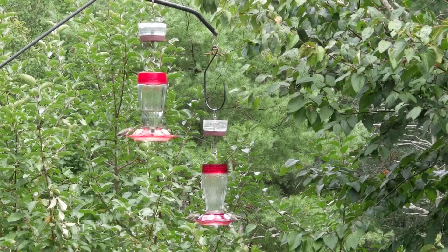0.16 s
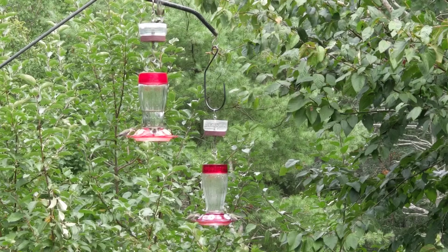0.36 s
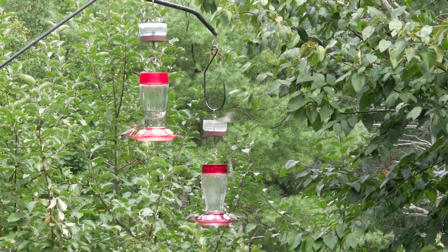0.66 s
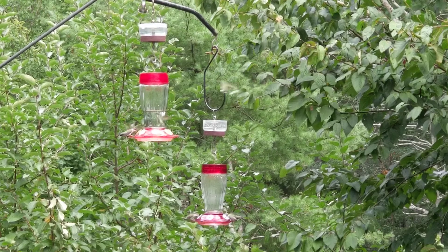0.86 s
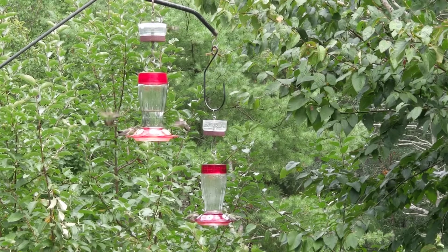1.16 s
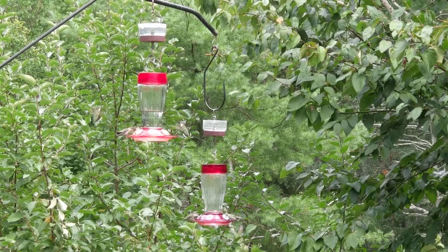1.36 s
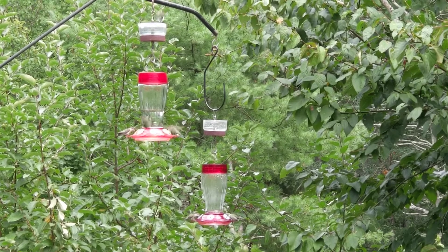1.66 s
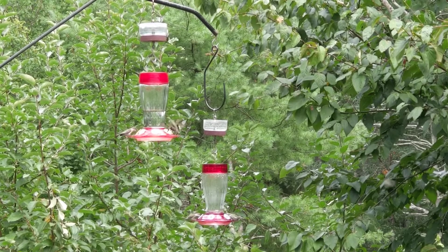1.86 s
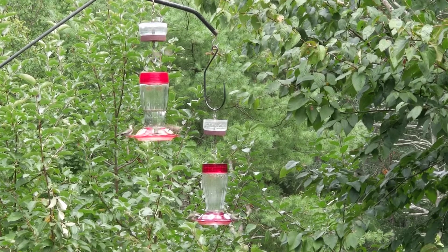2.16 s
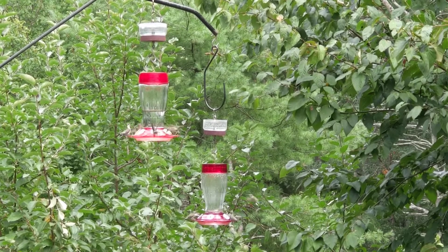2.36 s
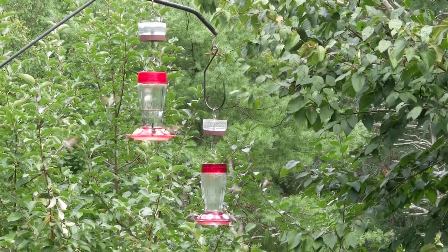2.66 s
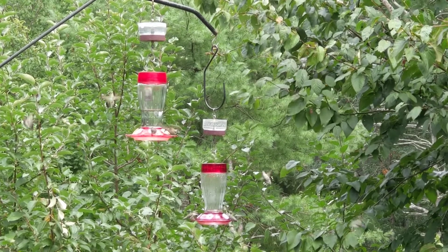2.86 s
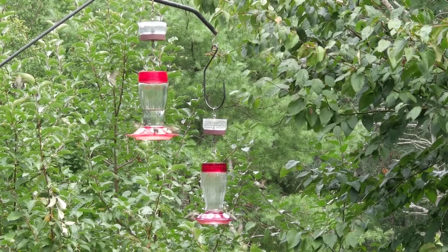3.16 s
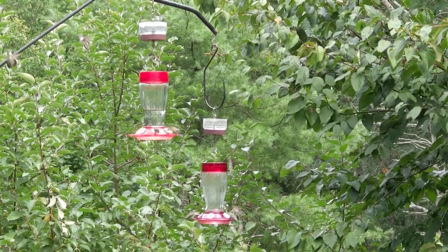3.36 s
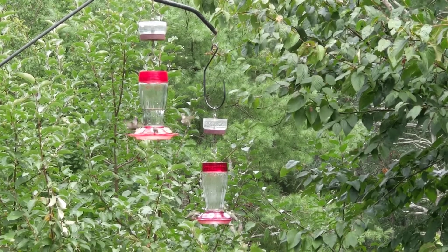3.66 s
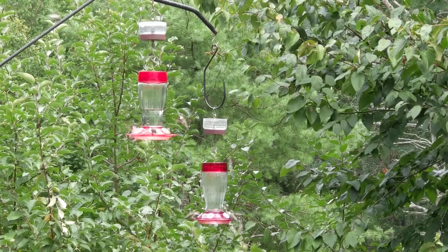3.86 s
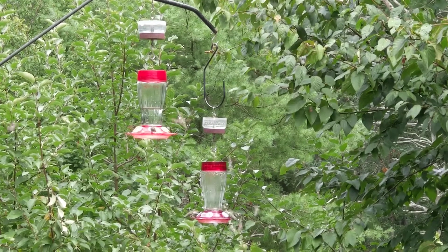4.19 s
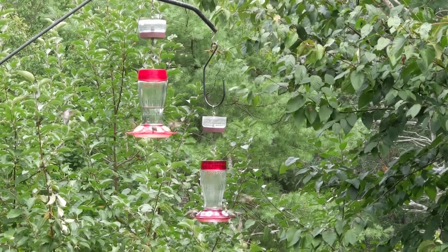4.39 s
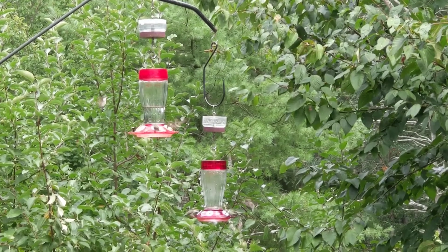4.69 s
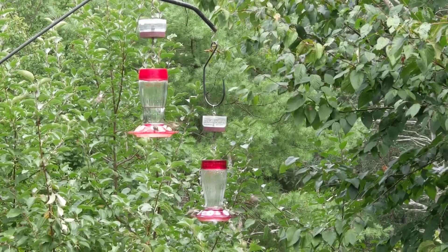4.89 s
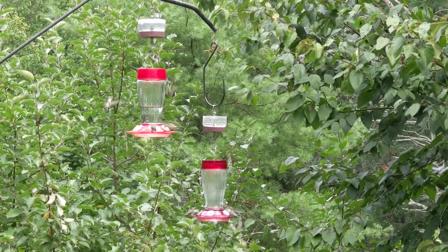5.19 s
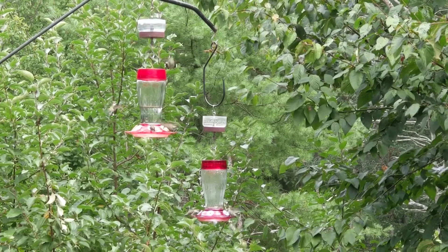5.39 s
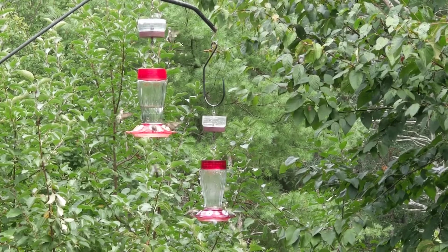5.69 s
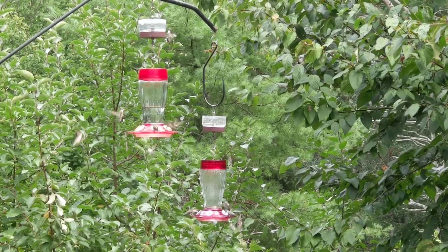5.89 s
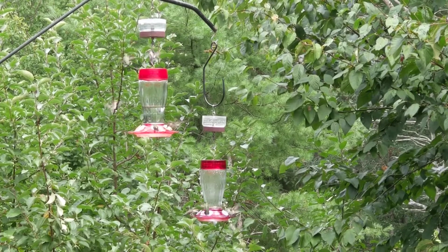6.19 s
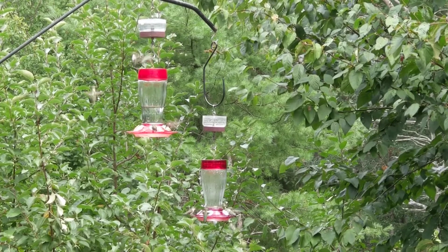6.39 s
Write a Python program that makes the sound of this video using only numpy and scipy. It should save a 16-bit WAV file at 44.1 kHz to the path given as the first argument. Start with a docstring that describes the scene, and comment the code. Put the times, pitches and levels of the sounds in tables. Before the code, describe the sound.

Soft low wingbeat hum and rapid, tiny hummingbird calls open close to the microphone: piercing squeals, brief rattling trills and dry falling chips. They stop near two seconds, leaving thin cricket shimmer, leafy hiss, bass rumble and a faint two-tone machine hum. Past four seconds the birds return deeper in foliage with squeals, a trill and buzzes, then spaced chips fading away. Open garden, wide stereo, light scatter from leaves.

```python
"""Thin squeals, trills, buzzes and dry chips come first: hummingbirds squabbling in a leafy summer backyard.
Their calls are gliding or swooping oscillators shaped by the beak and scattered by the foliage.
Wingbeats add low hums; cricket strokes and bands of noise make a high pulsing whine.
Far birds whistle in pure tones, tiny ticks are bursts of bright noise, and behind it all lie
a low rumble and leaf hiss of coloured noise and a faint wavering two-tone machine hum."""
import sys
import numpy as np
from scipy import signal
from scipy.fft import rfft, irfft, next_fast_len
from scipy.io import wavfile

SR = 44100
rng = np.random.default_rng(int(sys.argv[2]) if len(sys.argv) > 2 else 0)


def persist_wave(psi):
    """Save psi, clipped to +-1, as 16-bit WAV."""
    counts = np.round(np.clip(psi, -1, 1) * 32767).astype(np.int16)
    wavfile.write(sys.argv[1], SR, np.atleast_2d(counts).T)


N = 288414
T = np.arange(N) / SR   # sample times, s
CUTOFF_HZ = 15700       # top of the microphone's range

# Low outdoor rumble, all round. Each row: frequency in Hz, relative density in dB per Hz.
RUMBLE_SPECTRUM = [(25, -38), (45, -26.5), (85, -17), (110, -6.5), (140, 0.5), (210, 0), (255, -7),
                   (305, -5), (410, -12.5), (540, -13), (680, -13), (880, -21.5), (1600, -27.5),
                   (2100, -33)]
# Hiss of leaves and far insects. Each row: frequency in Hz, relative density in dB per Hz.
HISS_SPECTRUM = [(1700, -75), (2100, -13.5), (2420, -4), (2800, -6), (3850, -6), (4200, -10), (4600, -5),
                 (5400, -6.5), (5800, -9.5), (6400, -8), (9300, -18), (10000, -17), (11000, -15.5),
                 (14200, -16), (14700, -34), (15200, -61)]
# Slow course of the hiss. Each row: time in seconds, level in dB.
HISS_LEVEL_CURVE = [(0, -60.5), (2.2, -62), (3.9, -62.5), (4.6, -60.2), (5.6, -60), (6.54, -61)]
RUSTLE_DB = .7          # spread of the quick changes in the hiss
# Two tones of a distant machine. Each row: frequency in Hz, level against the curve below in dB.
MACHINE_TONES = [(341.5, -4), (465, -9.5)]
# Slow course of the machine hum. Each row: time in seconds, level in dB.
MACHINE_LEVEL_CURVE = [(0, -46.5), (.55, -63), (.8, -57.5), (1.65, -53.5), (2.4, -69), (3.6, -54),
                       (5, -56.5), (5.45, -50.5), (6.15, -55), (6.54, -58.5)]
# Stereo width of all continuous noise. Each row: frequency in Hz, side minus mid in dB.
STEREO_WIDTH = [(60, -26), (92, -15), (140, -23.5), (210, -17.5), (330, -13.5), (500, -11), (770, -7),
                (1170, -2.5), (1790, -1), (2740, -3.5), (4190, -0.5), (6410, -1), (9810, -1), (15000, 0.5)]

# Far crickets merged to a whine. Each row: frequency in Hz, relative density in dB per Hz.
SWARM_SPECTRUM = [(6300, 2), (6600, 18), (7000, 18.5), (7400, 21.5), (8100, 20), (8400, 0), (8900, -14),
                  (9400, -11)]
# Distant trilling crickets that stand out. Each row: centre in Hz, width in Hz, level in dB.
CRICKET_LINES = [(6720, 45, -69), (6890, 57, -73), (7500, 31, -76), (8130, 29, -70.5), (8520, 59, -66.5),
                 (9060, 91, -72)]
# Faint far insects that come and go. Each row: centre in Hz, width in Hz, level in dB.
CHIRR_BANDS = [(2410, 210, -72.5), (3510, 220, -82.5), (4470, 130, -77.5), (5230, 120, -76),
               (6140, 180, -76)]

# One far bird's slurred whistle. Each row: time in seconds, pitch in Hz, level in dB.
SLURRED_WHISTLE_CURVE = [(1.9, 2520, -70), (1.92, 2515, -63), (1.95, 2485, -57.5), (1.97, 2430, -59),
                         (1.99, 2405, -60), (2.04, 2420, -62), (2.11, 2450, -63), (2.14, 2470, -73)]
# Lower, fainter far whistles. Each row: start in seconds, length in seconds, first pitch in Hz,
# last pitch in Hz, bend in the middle in Hz, peak level in dB, place of the peak 0-1.
LOW_WHISTLES = [(5.304, 0.43, 1387, 1370, -15, -70, 0), (5.612, 0.13, 1540, 1580, -2, -64.5, 0.4)]
WHISTLE_SWELL_DB, WHISTLE_BEND = 5, 0.77   # rise and fall; below 1 the pitch moves fastest at the start

# Hovering birds. Each row: start in seconds, length in seconds, hum pitch in Hz before drift and sag,
# level in dB, tilt of the overtones in dB per octave.
HOVERING_BIRDS = [(-.15, 0.89, 163.4, -42.5, 0.5), (.68, 1.14, 163.7, -43, -21), (3, 0.45, 139.7, -53.5, 4),
                  (3.6, 0.5, 149.8, -60.5, 16), (3.85, 0.43, 135, -52, 1.5),
                  (4.299, 0.84, 136.6, -47.5, 1.5), (4.2, 0.84, 152.5, -53.5, 12)]
# Partials of the wing hum. Each row: multiple of the hum pitch, level in dB before the tilt.
WING_PARTIALS = [(1, -1.5), (1.5, -18), (2, -12)]
HOVER_ARRIVE_S, HOVER_LEAVE_S, HOVER_SAG_HZ = 0.16, 0.16, 2.6   # swell, fade, and sag during the fade

# Tiny bright ticks. Each row: start in seconds, first level in dB before the high-pass.
BRIGHT_TICKS = [(5.741, -55), (5.997, -46)]

# Resonance of throat and open beak. Each row: frequency in Hz, gain in dB.
OPEN_BEAK = [(2000, 9), (2600, -13.5), (4000, -12.5), (5200, -16), (6300, -4.5), (7600, -1), (9200, -11),
             (12000, -12.5), (14000, -17.5), (15600, -37), (17000, -50)]
# Beak nearly shut for a chip. Each row: frequency in Hz, gain in dB.
SHUT_BEAK = [(1800, -32), (2100, -17), (2400, -6), (2750, -11.5), (3400, -12), (4200, -12.5), (5200, -14),
             (6000, -14.5), (7500, -10), (9000, -16.5), (10500, -17), (12500, -22), (15500, -37)]
RIGHT_DELAY_MS = 0.035   # the feeders hang a little to the left
# All call levels below are taken ahead of the beak's gain.

# Squeals. Each row: start in seconds, length in seconds, first pitch in Hz, last pitch in Hz,
# peak level in dB, place of the peak 0-1, dB per overtone, left minus right in dB,
# delay of the right channel in ms. The arch below is added to the pitch.
SQUEAL_CALLS = [(0.033, 0.041, 7440, 7330, -43, 0.2, 7, 2, 0.039),
                (1.305, 0.039, 7700, 7400, -37, 0.2, -4, 1, .043),
                (1.342, 0.041, 6900, 6560, -29, 0.54, 1.5, 2, 0.048),
                (1.729, 0.038, 7900, 7730, -31.3, 0.7, 11, -1, .043),
                (4.274, 0.023, 7100, 7140, -46, 0.3, -10, -3, 0.038),
                (4.297, 0.05, 6490, 6760, -41, 0.1, 3.5, 2.5, 0.065),
                (4.456, 0.029, 6440, 6540, -46.5, 0.9, 4.5, 1, 0.055),
                (4.485, 0.041, 6656, 6640, -28, 0.05, -9, -0.5, 0.051),
                (4.534, .068, 6640, 6550, -37.5, .5, -7, 3, .053),
                (4.497, 0.081, 6220, 6290, -43.5, 0.4, 5, 1, 0.054),
                (4.648, 0.014, 6500, 6530, -37.5, 0.1, -13, 2, 0.058),
                (4.793, 0.077, 6485, 6610, -36.5, 0.5, -1, 4.5, 0.064)]
SQUEAL_RISE_DB, SQUEAL_FALL_DB, SQUEAL_ARCH_HZ = 2.5, 8.5, 39.8

# Trills. Each row: start in seconds, length in seconds, first and last swoops per second,
# top pitch in Hz before the sag, first dip in Hz, last dip in Hz, place 0-1 where the dips change depth,
# peak level in dB, place of the peak 0-1, dB per overtone, downstroke in dB, narrowness of the dips,
# push in a dip in dB per octave of plunge.
TRILL_CALLS = [(0.081, .062, 72, 72, 7250, 6850, 2700, .42, -36.5, .1, -9, -18, 2.6, 9),
               (0.6015, 0.044, 76, 72, 7050, 5400, 2400, .48, -40, .08, -8, -14, 2.0, 12),
               (1.4355, .104, 74, 59, 7650, 5700, 4200, .62, -36.3, .44, -14, -2, 1.5, 6),
               (4.656, 0.085, 72, 69, 6680, 6000, 3000, .34, -37, 0.3, -15, -9, 3.0, 11)]
TRILL_RISE_DB, TRILL_FALL_DB = 11, 16.5
TRILL_SAG = 0.099             # share by which the top of the arches sinks over the call
TRILL_BREAK_WIDTH = 0.078     # how gradually the dips deepen, as a share of the call
TRILL_FLARE_DB = 8.5          # extra dB per overtone at the bottom of a dip

# Buzzes. Each row: start in seconds, length in seconds, swoops per second, first top in Hz,
# last top in Hz, first dip in Hz, last dip in Hz, peak level in dB, dB per overtone.
BUZZ_CALLS = [(0.2329, 0.04, 191, 6300, 5400, 3200, 2500, -35.5, -2.5),
              (0.493, 0.041, 188, 6300, 5200, 3200, 2450, -36, 0),
              (2.87, 0.065, 180, 4170, 3900, 2810, 2480, -51, -13),
              (4.742, 0.066, 205, 6120, 6140, 4700, 3900, -46, 0),
              (4.8098, .068, 207, 4900, 4300, 2950, 2450, -37.2, -5.5),
              (5.165, 0.08, 160, 6300, 6100, 5400, 3600, -43.5, -4)]
BUZZ_RISE_DB, BUZZ_FALL_DB, BUZZ_PEAK = 8, 9, 0.35   # peak as a share of the call
BUZZ_NOTCH, BUZZ_DOWNSTROKE_DB = .85, -1             # narrowness of the dips; level on the way down

# Rich chips. Each row: start in seconds, length in seconds, first pitch in Hz, last pitch in Hz,
# peak level in dB, bend (above 1 the fall gathers speed, below 1 it flattens), dB per overtone,
# beak resonance in Hz.
RICH_CHIPS = [(0.133, .006, 2900, 2350, -49, 1, 0, 7400), (0.626, .006, 2750, 2550, -46.5, 1, 1.5, 6200),
              (0.638, .006, 2600, 2200, -50, 1, 1, 7400), (0.323, .02, 2700, 2080, -43.5, 1.6, 0, 7800),
              (0.396, 0.022, 2630, 2000, -44.5, 1.5, .5, 7600),
              (0.744, 0.019, 2700, 1880, -43.5, 1.3, -.5, 7700),
              (.821, .018, 2680, 1850, -45.5, 1.4, -1.5, 7000),
              (0.904, 0.015, 2750, 1850, -44, 1.2, -3.5, 5800), (0.99, .014, 2500, 1800, -53, 1, -1, 7400),
              (1.378, 0.006, 6600, 4600, -46, 1, -3, 7000), (1.600, 0.027, 2880, 1780, -40.5, .9, 0, 7800),
              (1.658, .023, 3400, 1800, -47, .8, 1.5, 6600), (1.719, .012, 4600, 1950, -42.5, .8, 0, 7700),
              (1.766, .008, 7700, 3100, -42.5, 1, 3, 7200), (1.779, .012, 3000, 1950, -48, .9, 1.8, 7800)]
# Purer chips from deeper in the foliage. Each row: start in seconds, length in seconds,
# first pitch in Hz, last pitch in Hz, peak level in dB.
FOLIAGE_CHIPS = [(2.355, .012, 5660, 4700, -52), (4.988, 0.013, 4700, 2270, -42),
                 (5.055, 0.014, 4540, 2270, -43), (5.139, 0.0083, 4440, 2630, -43),
                 (5.208, 0.008, 4780, 2490, -44), (5.398, .012, 4820, 2600, -48),
                 (5.468, .012, 4920, 2580, -50), (5.54, 0.011, 4410, 2600, -50),
                 (5.644, 0.0097, 4810, 2600, -50), (5.724, 0.014, 5220, 2520, -49),
                 (5.97, 0.011, 5240, 3440, -55), (6.492, 0.012, 4840, 2630, -49)]
DEEP_CHIP_BEND, DEEP_CHIP_OVERTONE_DB, DEEP_CHIP_BEAK_HZ = .8, -5, 7400
CHIP_RISE_DB, CHIP_FALL_DB, CHIP_PEAK = 12, 10, .25   # peak as a share of the chip
CHIP_RESONANCE_DB, CHIP_RESONANCE_WIDTH_HZ = 13, 650

# Reflections off the feeders, the house and leaves. Each row: delay to the left channel in ms,
# delay to the right channel in ms, relative level in dB.
REFLECTIONS = [(2.27, 10, -21), (6.144, 3.1, 0), (9.7, 17, -2.5), (15.76, 15.6, -18.5), (22.3, 22, -12)]
TAIL_CUT_HZ = 11000   # leaves soak up the treble of the long tail


def from_db(db):
    """Decibels to gain."""
    return 10 ** (np.asarray(db) / 20)


def rms_one(x):
    """Scale to unit power."""
    return x / np.sqrt(np.mean(x ** 2) + 1e-20)


def at_hz(points, hz):
    """Read a spectrum on a log-frequency axis."""
    f, value = np.transpose(points)
    return np.interp(np.log(np.maximum(hz, 1)), np.log(f), value)


def follow(rows):
    """Sample times that a curve spans, and its columns at those times."""
    s, *columns = np.transpose(rows)
    t = T[(T >= s.min()) & (T <= s.max())]
    return [t] + [np.interp(t, s, c) for c in columns]


def span(start, length):
    """Sample times of an event, and its progress from 0 to 1."""
    return follow([(start, 0), (start + length, 1)])


def drift(t, rate):
    """Random wander around 0: normal draws, so many a second, joined by straight lines."""
    knots = rng.standard_normal(8192)
    return np.interp((t - t[0]) * rate, np.arange(len(knots)), knots)


def fade(t, edge_s):
    """Soft start and end."""
    return np.sin(np.pi / 2 * np.clip(np.minimum(t - t[0], t[-1] - t) / edge_s, 0, 1)) ** 2


def swell(progress, peak, rise_db, fall_db):
    """Level in dB that climbs to 0 at the peak and sinks again."""
    return np.interp(progress, [0, np.clip(peak, .01, .99), 1], [-rise_db, 0, -fall_db])


def slur(progress, first_hz, last_hz, bend_hz=0):
    """A glide from one value to another, bowed in the middle."""
    return first_hz + (last_hz - first_hz) * progress + bend_hz * np.sin(np.pi * progress)


def add(out, t, sound):
    """Mix a sound in at its own time."""
    start = int(round(t[0] * SR))
    out[:, start:start + len(t)] += sound


def noise(gain_at):
    """Stereo noise of a given colour, alike in both channels in the bass and wide in the treble."""
    size = next_fast_len(N)
    hz = np.arange(size // 2 + 1) * SR / size
    mid, side = rfft(rng.standard_normal((2, size))) * gain_at(hz)
    opposed_side = side * from_db(at_hz(STEREO_WIDTH, hz)) * np.array([[1], [-1]])
    return rms_one(irfft(mid + opposed_side, size)[:, :N])


def outdoors(rumble_db=-47, waver_hz=2.06, waver_db=2.5):
    """Low rumble and leaf hiss as coloured noise, and the wavering tones of a distant machine."""
    rumble = noise(lambda hz: from_db(at_hz(RUMBLE_SPECTRUM, hz)) / (1 + (hz / 2600) ** 8))
    hiss = noise(lambda hz: from_db(at_hz(HISS_SPECTRUM, hz)))
    hiss_db = np.interp(T, *np.transpose(HISS_LEVEL_CURVE)) + RUSTLE_DB * drift(T, 12)
    out = from_db(rumble_db) * rumble + from_db(hiss_db) * hiss
    hum_db = np.interp(T, *np.transpose(MACHINE_LEVEL_CURVE))
    for hz, tone_db in MACHINE_TONES:
        phase = 2 * np.pi * np.cumsum(hz + waver_hz * drift(T, 8)) / SR
        level_db = hum_db + tone_db + waver_db * drift(T, 7)
        out = out + np.sqrt(2) * from_db(level_db) * np.sin(phase)
    return out


def insect_chorus(swarm_db=-59, rasp_db=-69, rasp_hz=8800, rasp_width_hz=280, rasp_rate=21):
    """Many far crickets merge to a whine; a few stand out as lines, and one higher insect throbs."""
    low_hz, high_hz = SWARM_SPECTRUM[0][0], SWARM_SPECTRUM[-1][0]
    swarm = noise(lambda hz: from_db(at_hz(SWARM_SPECTRUM, hz)) * (hz > low_hz) * (hz < high_hz))
    out = from_db(swarm_db) * swarm
    for centre, width, db in CRICKET_LINES:
        out = out + from_db(db) * noise(lambda hz: 1 / (1 + ((hz - centre) / width) ** 2))
    throb = 1 + np.sin(2 * np.pi * rasp_rate * T + drift(T, 4.07))
    rasp = rms_one(throb * noise(lambda hz: np.exp(-((hz - rasp_hz) / rasp_width_hz) ** 2)))
    return out + from_db(rasp_db) * rasp


def chirrs(flicker_db=2.8, flicker_rate=24):
    """Narrow noise bands of far insect song, each flickering in level by itself."""
    out = np.zeros((2, N))
    for centre, width, db in CHIRR_BANDS:
        band = noise(lambda hz: np.exp(-((hz - centre) / width) ** 2))
        out += from_db(db) * rms_one(from_db(flicker_db * drift(T, flicker_rate)) * band)
    return out


def near_cricket(base_db=-55.5, high_hz=7300, low_hz=6790, stroke_s=0.011, eager_from_s=3.6):
    """Each wing stroke is a falling tone; strokes come in pairs, later also in threes and fours."""
    spacing_s, rest_s = .015, .0093   # start to start in a group; least extra gap between groups
    out, start = np.zeros((2, N)), 0
    for luck, slack, loud, detune in rng.random((200, 4)):
        strokes = 2 + (start > eager_from_s) * (int(luck > .55) + int(luck > .85))
        level_db = base_db + 4.6 * loud
        for _ in range(strokes):
            if start + stroke_s < T[-1]:
                t, hz = follow([(start, high_hz), (start + stroke_s, low_hz)])
                phase = 2 * np.pi * np.cumsum(hz + 60 * (detune - .5)) / SR
                tone = np.sqrt(2) * np.sin(phase + np.array([[0], [.6]]))   # right channel leads in phase
                add(out, t, from_db(level_db) * fade(t, stroke_s / 2) * tone)
            start += spacing_s
        start += rest_s * (1 + .6 * slack ** 5)
    return out


def whistle(t, hz, level_db, waver=0.0012, waver_db=1.2):
    """A pure tone that wavers on its way through the trees, with its sample times."""
    phase = 2 * np.pi * np.cumsum(hz * (1 + waver * drift(t, 110))) / SR
    return t, np.sqrt(2) * from_db(level_db + waver_db * drift(t, 46)) * fade(t, 0.013) * np.sin(phase)


def far_birds():
    """Pure gliding whistles from the trees: one slurred, then lower and fainter ones."""
    out = np.zeros((2, N))
    add(out, *whistle(*follow(SLURRED_WHISTLE_CURVE)))
    for start, length, first_hz, last_hz, bend_hz, peak_db, peak in LOW_WHISTLES:
        t, progress = span(start, length)
        hz = slur(progress ** WHISTLE_BEND, first_hz, last_hz, bend_hz)
        level_db = peak_db + swell(progress, peak, WHISTLE_SWELL_DB, WHISTLE_SWELL_DB)
        add(out, *whistle(t, hz, level_db))
    return out


def ticks(t60_s=0.013, low_hz=7000):
    """Tiny bursts of high-passed noise that die by 60 dB at once."""
    out = np.zeros((2, N))
    high_pass = signal.butter(2, low_hz, "high", fs=SR)
    for start, level_db in BRIGHT_TICKS:
        t, progress = span(start, t60_s)
        snap = signal.lfilter(*high_pass, rng.standard_normal((2, len(t))))
        add(out, t, snap * from_db(level_db - 60 * progress))
    return out


def wings(wobble=0.0048, flutter_db=1.5):
    """Wingbeats of a hovering bird make a soft hum that swells as it comes, fades and sags as it leaves."""
    out = np.zeros((2, N))
    for start, length, hz, level_db, tilt_db in HOVERING_BIRDS:
        t, _ = span(start, length)
        arrived = np.clip((t - start) / HOVER_ARRIVE_S, 0, 1)
        staying = np.clip((start + length - t) / HOVER_LEAVE_S, 0, 1)
        beat_hz = (hz - HOVER_SAG_HZ * (1 - staying)) * (1 + wobble * drift(t, 15.5))
        phase = 2 * np.pi * np.cumsum(beat_hz) / SR
        hum = sum(from_db(db + tilt_db * np.log2(k)) * np.sin(k * phase) for k, db in WING_PARTIALS)
        gain = arrived * staying * from_db(level_db + flutter_db * drift(t, 7.6))
        add(out, t, np.sqrt(2) * hum * gain)
    return out


def syrinx(t, hz, level_db, overtone_db, delay_ms, jitter, rasp, beak=OPEN_BEAK,
           shimmer_db=2.0, right_treble_db=7.0):
    """A slightly unsteady oscillator whose harmonics pass the beak resonance; fast flutter makes it rasp."""
    hz = hz * (1 + jitter * drift(t, 716))
    phase = 2 * np.pi * (np.cumsum(hz) / SR - hz * np.array([[0], [delay_ms]]) / 1000)
    out = 0
    for k in range(1, 7):
        # above 8 kHz the sound leans to the right channel
        lean_db = right_treble_db * np.clip((k * hz - 8000) / 4000, 0, 1) * np.array([[-.5], [.5]])
        harmonic_db = at_hz(beak, k * hz) + overtone_db * (k - 1) + lean_db
        out = out + from_db(harmonic_db) * (k * hz < SR / 2) * np.sin(k * phase)
    flutter = from_db(shimmer_db * drift(t, 440)) * (1 + rasp * drift(t, 2500))
    return np.sqrt(2) * out * from_db(level_db) * flutter * fade(t, .0007)


def swoops(t, rate, top_hz, dip_hz, notch, first_phase=0, stumble=0.023):
    """Pitch that lingers at each arch's top and plunges between; also its depth and downward share, 0-1."""
    turns = first_phase + np.cumsum(rate * np.ones(len(t))) / SR
    arch = (turns + stumble * drift(t, np.mean(rate))) % 1
    falling = np.interp(arch, [0, .04, .5, .8, .94, 1], [.15, 0, 0, 1, 1, .15])
    depth = (1 - np.sin(np.pi * arch)) ** notch
    return top_hz + (dip_hz - top_hz) * depth, depth, falling


def chip(start, length, first_hz, last_hz, peak_db, bend, overtone_db, beak_hz):
    """A steeply falling note whose harmonics flare at the beak resonance, with its sample times."""
    t, progress = span(start, length)
    hz = slur(progress ** bend, first_hz, last_hz)
    level_db = peak_db + swell(progress, CHIP_PEAK, CHIP_RISE_DB, CHIP_FALL_DB)
    grid_hz = np.geomspace(1500, 17000, 200)
    resonance_db = CHIP_RESONANCE_DB / (1 + ((grid_hz - beak_hz) / CHIP_RESONANCE_WIDTH_HZ) ** 2)
    beak = np.transpose([grid_hz, at_hz(SHUT_BEAK, grid_hz) + resonance_db])
    return t, syrinx(t, hz, level_db, overtone_db, RIGHT_DELAY_MS, jitter=.012, rasp=.24, beak=beak)


def chips():
    """Short dry falling notes from a nearly shut beak: rich ones, and purer ones deeper in the foliage."""
    out = np.zeros((2, N))
    for row in RICH_CHIPS:
        add(out, *chip(*row))
    for row in FOLIAGE_CHIPS:
        add(out, *chip(*row, DEEP_CHIP_BEND, DEEP_CHIP_OVERTONE_DB, DEEP_CHIP_BEAK_HZ))
    return out


def buzzes(uneven_db=2.5, uneven_dips=0.06):
    """Wide swoops of uneven strength and depth, so fast that they are heard as a sinking rattle."""
    out = np.zeros((2, N))
    for (start, length, rate, first_top_hz, last_top_hz, first_dip_hz, last_dip_hz,
         peak_db, overtone_db) in BUZZ_CALLS:
        t, progress = span(start, length)
        top_hz = slur(progress, first_top_hz, last_top_hz)
        dip_hz = slur(progress, first_dip_hz, last_dip_hz) * (1 + uneven_dips * drift(t, rate))
        hz, _, falling = swoops(t, rate, top_hz, dip_hz, BUZZ_NOTCH, first_phase=.25)
        level_db = peak_db + swell(progress, BUZZ_PEAK, BUZZ_RISE_DB, BUZZ_FALL_DB)
        level_db = level_db + BUZZ_DOWNSTROKE_DB * falling + uneven_db * drift(t, rate)
        add(out, t, syrinx(t, hz, level_db, overtone_db, RIGHT_DELAY_MS, jitter=.016, rasp=.2))
    return out


def trills():
    """A high note breaks into arches whose dips deepen; each dip is pushed harder and is brighter."""
    out = np.zeros((2, N))
    for (start, length, first_rate, last_rate, top_hz, first_dip_hz, last_dip_hz, breaks_at,
         peak_db, peak, overtone_db, downstroke_db, notch, push) in TRILL_CALLS:
        t, progress = span(start, length)
        broken = .5 + .5 * np.tanh(.5 * (progress - breaks_at) / TRILL_BREAK_WIDTH)
        dip_hz = first_dip_hz + (last_dip_hz - first_dip_hz) * broken
        sagging_top_hz = top_hz * (1 - TRILL_SAG * progress)
        rate = slur(progress, first_rate, last_rate)
        hz, depth, falling = swoops(t, rate, sagging_top_hz, dip_hz, notch)
        level_db = peak_db + swell(progress, peak, TRILL_RISE_DB, TRILL_FALL_DB)
        level_db = level_db + downstroke_db * falling + push * np.log2(top_hz / hz)
        bright_db = overtone_db + TRILL_FLARE_DB * depth ** .3
        add(out, t, syrinx(t, hz, level_db, bright_db, RIGHT_DELAY_MS, jitter=.009, rasp=.15))
    return out


def squeals():
    """Thin held notes that swell and fade on a slight glide, bulging in the middle."""
    out = np.zeros((2, N))
    for (start, length, first_hz, last_hz, peak_db, peak, overtone_db,
         pan_db, delay_ms) in SQUEAL_CALLS:
        t, progress = span(start, length)
        hz = slur(progress, first_hz, last_hz, SQUEAL_ARCH_HZ)
        level_db = peak_db + swell(progress, peak, SQUEAL_RISE_DB, SQUEAL_FALL_DB)
        level_db = level_db + pan_db * np.array([[.5], [-.5]])
        add(out, t, syrinx(t, hz, level_db, overtone_db, delay_ms, jitter=0.0057, rasp=0.057))
    return out


def hummingbirds():
    """All calls of the squabble, voiced by the syrinx and coloured by the beak."""
    return squeals() + trills() + buzzes() + chips()


def garden(x, echoes_db, early_db, late_db, early_t60_s=0.14, late_t60_s=0.5):
    """A few distinct echoes, quick scatter from nearby leaves and a faint tail from the trees."""
    t = T[:SR // 2]
    response = np.zeros((2, len(t)))
    for level_db, t60_s, cut_hz in (early_db, early_t60_s, CUTOFF_HZ), (late_db, late_t60_s, TAIL_CUT_HZ):
        decay = from_db(-60 * t / t60_s) * np.minimum(t / 0.003, 1)
        tail = rng.standard_normal((2, len(t))) * decay
        energy = np.sum(tail ** 2) / 2   # mean of the two channels
        dull = signal.butter(2, cut_hz, fs=SR)
        response += from_db(level_db) * signal.lfilter(*dull, tail) / np.sqrt(energy)
    for left_ms, right_ms, echo_db in REFLECTIONS:
        delays = (np.array([left_ms, right_ms]) * SR / 1000).astype(int)
        response[[0, 1], delays] += from_db(echoes_db + echo_db)
    return x + signal.fftconvolve(x, response, axes=1)[:, :N]


def scene():
    """The first squabble is close by, the second deeper in the foliage; insects and rumble all round."""
    background = outdoors() + insect_chorus() + chirrs() + near_cricket()
    far = garden(far_birds(), echoes_db=-12, early_db=-17, late_db=-15)
    calls, close = hummingbirds(), T < 2.2
    near_calls = garden(calls * close, echoes_db=-8, early_db=-12.5, late_db=-17)
    deep_calls = garden(calls * ~close, echoes_db=-3.5, early_db=-8.5, late_db=-10)
    return background + far + ticks() + wings() + deep_calls + near_calls


def record(dry):
    """The microphone's top is cut steeply by an elliptic low-pass."""
    low_pass = signal.ellip(10, .2, 80, CUTOFF_HZ, fs=SR, output="sos")   # ripple and stop-band in dB
    return signal.sosfilt(low_pass, dry)


dry = scene()
out = record(dry)
persist_wave(out)
```